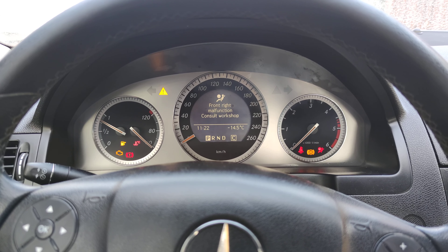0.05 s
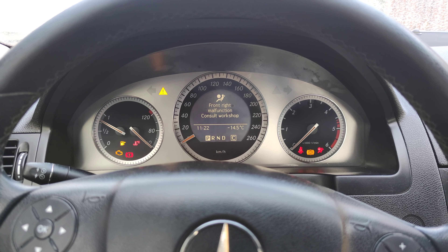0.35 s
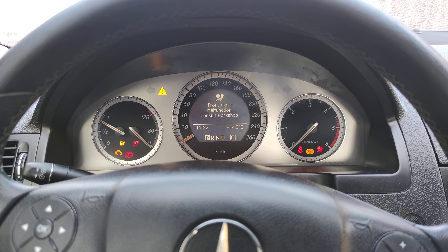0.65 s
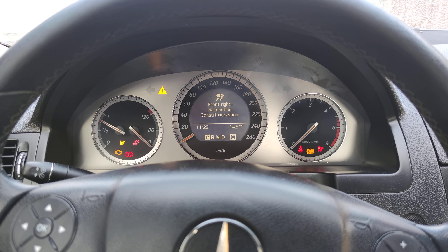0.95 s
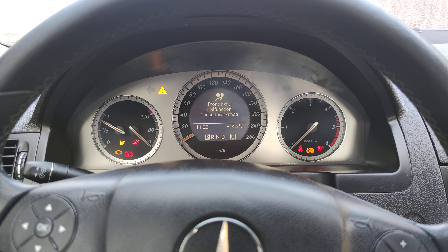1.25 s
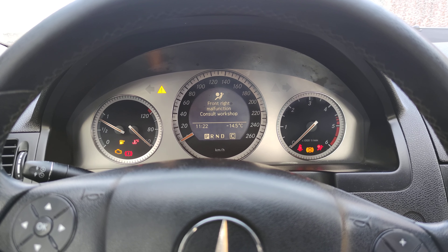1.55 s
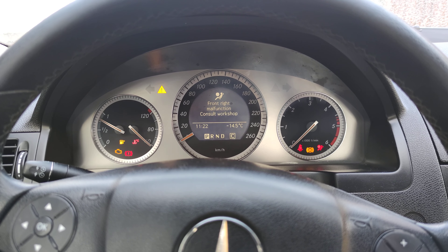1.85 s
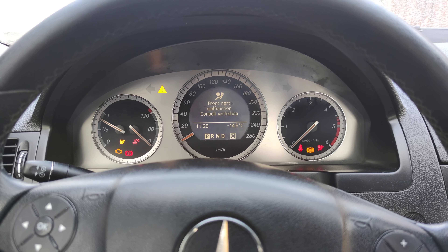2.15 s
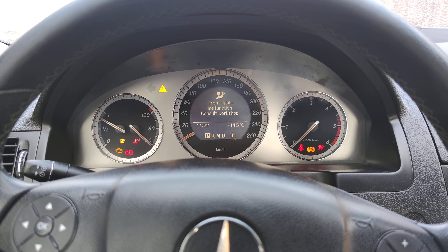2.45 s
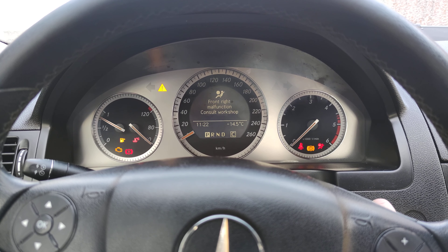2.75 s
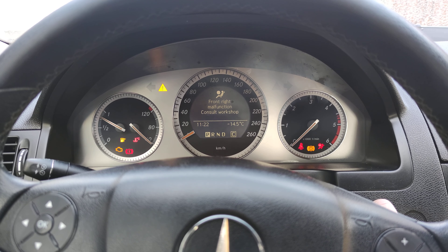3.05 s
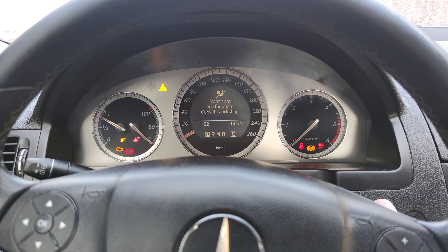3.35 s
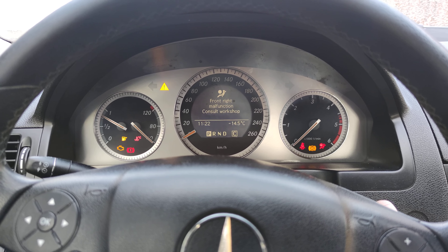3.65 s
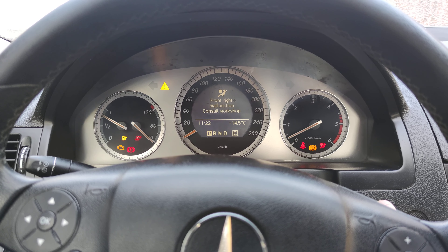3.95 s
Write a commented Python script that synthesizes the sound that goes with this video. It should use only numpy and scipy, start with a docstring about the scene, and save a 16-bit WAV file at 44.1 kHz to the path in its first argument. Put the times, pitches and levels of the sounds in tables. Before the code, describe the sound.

A car engine starts, heard from the driver's seat. A faint fuel pump hum runs down, the key clicks in the ignition, and the starter whines unevenly until the engine catches with low thumps and dashboard rattles.

```python
"""A car engine starts, heard from the driver's seat. First the fuel pump hums and runs down, and the
key clicks round in the lock. The starter's gear teeth whine, slowing each time the engine squeezes
the air in a cylinder. Then the engine catches: its first firings thump through the car's body and
make something rattle in the dashboard."""
import sys
import numpy as np
from scipy import signal
from scipy.fft import rfft, irfft, next_fast_len
from scipy.io import wavfile
from scipy.ndimage import map_coordinates

SR = 44100
rng = np.random.default_rng(int(sys.argv[2]) if len(sys.argv) > 2 else 0)


def transcribe(u):
    """Save the signal u as a 16-bit wav file named by the first command-line argument.

    u: samples, shape (n,) or (channels, n), limited to [-1, 1]; the rate is SR.
    q: integer samples, one column per channel.
    """
    v = np.clip(np.atleast_2d(u).T, -1, 1)
    q = np.round(v * 32767).astype(np.int16)
    wavfile.write(sys.argv[1], SR, q)


N = 176400

# The tones of the pump's hum. Each row: multiple of the shaft's turning rate, level in dB.
PUMP_TONES = [(2, -79), (3, -65.5), (4, -83), (5, -62.5), (7, -85)]
# Pitches at which the pump's mount likes to shake. Each row: pitch in Hz, width in Hz, boost in dB.
MOUNT_PEAKS = [(109.8, 8.9, 10.5), (147, 7.3, -1)]
# The faint background sound in the cabin. Each row: frequency in Hz, level in dB.
QUIET_COLOUR = [(13, -66), (22, -13), (70, -5.5), (112, -5), (156, -8), (200, -11.5), (223, -13.5),
                (256, -13), (690, -20), (885, -20), (1670, -28.5), (1910, -27.5), (6620, -42.5),
                (8720, -33), (11500, -37), (14700, -30.5), (16000, -39)]
# Small ticks, then clatter once the engine fires.
# Each row: start in seconds, level in dB, centre in Hz, width in octaves, fade time in seconds.
TRIM_TICKS = [(0.274, -58, 4000, 1.8, 0.072), (0.671, -56, 8900, 0.045, 0.018),
              (1.766, -58, 2500, 0.89, 0.035), (2.436, -40, 865, 0.35, 0.043),
              (3.584, -42, 760, 0.54, 0.032), (3.669, -52, 2550, 0.4, 0.049),
              (3.707, -51, 2480, 1.2, 0.031), (3.708, -37, 870, 0.48, 0.052),
              (3.741, -43, 3000, 0.82, 0.069), (3.797, -46.5, 897, 0.79, 0.046),
              (3.742, -34.5, 903, 0.23, 0.039), (3.848, -42, 3080, 0.54, 0.087),
              (3.913, -43, 2820, 0.53, 0.086), (3.963, -54, 3260, 1.3, 0.12), (3.983, -44, 785, 1.13, 0.21)]
# Ringing metal. Each row: pitch in Hz, width in Hz, boost in dB.
METAL_PEAKS = [(736, 145, 6.5), (2408, 41, 13.5), (2870, 240, 5), (3554, 126, 10.5), (8200, 900, 8.5)]
# Soft bumps and dull knocks. Each row: start in seconds, level in dB, pitch in Hz.
PANEL_BUMPS = [(0.284, -59, 208), (1.596, -62, 297), (0.395, -45, 192.5), (2.442, -48.5, 296),
               (2.514, -44, 79), (2.779, -32, 412), (3.581, -31, 361), (3.589, -26.5, 299.4),
               (3.715, -32, 384), (3.788, -37.5, 376), (3.866, -32.5, 266)]
# The hand rubbing on the key. Each row: time in seconds, level in dB.
RUB_LEVELS = [(2.15, -73.5), (2.3, -69), (2.42, -59), (2.52, -58), (2.6, -70), (2.7, -67.5), (2.8, -83)]
# The tone of that rubbing. Each row: frequency in Hz, level in dB.
RUB_COLOUR = [(120, -39), (200, -19), (334, -2.5), (569, 3), (749, -5), (821, -2), (1740, -1),
              (6760, -13.5), (7680, -10.5), (16000, -17)]
# A faint relay-like click (the first two rows), then the key and lock. Each row: start in seconds,
# level in dB, treble tilt in dB per octave, favoured frequency in Hz, fade time in seconds.
CLICKS = [(0.971, -49, -1.5, 1690, 0.03), (0.975, -53.5, 2.5, 3220, 0.048),
          (2.435, -38.5, -2.5, 900, 0.051), (2.477, -33, -1, 7550, 0.063), (2.718, -44.5, -2, 8500, 0.13),
          (2.748, -28.5, -0.1, 4200, 0.11), (2.762, -24, 1, 8150, 0.037), (2.835, -35.5, 1, 2700, 0.05),
          (2.895, -51, 0, 7500, 0.028)]
# The tone those clicks share. Each row: frequency in Hz, level in dB.
CLICK_COLOUR = [(120, -3), (250, -7.5), (520, -7), (850, -7), (1400, -10), (1800, -7), (2700, -10),
                (4600, -9.5), (6600, -15.5), (8200, -8), (10500, -15.5), (12000, -14), (16000, -12.5)]
# The metallic ring of the clicks. Each row: pitch in Hz, width in Hz, boost in dB.
CLICK_PEAKS = [(1700, 76, 7.5), (1774, 78, 7), (2330, 47, 9.5), (3190, 120, 8.5), (4250, 44, -1),
               (8100, 600, 1.5), (9800, 470, 6.5)]
# The starter's speed and strength. Each row: time in seconds, teeth meeting per second, level in dB.
CRANKING = [(2.79, 248.5, -83), (2.87, 324.5, -46.5), (2.95, 336.2, -54.5), (3.03, 334.3, -55),
            (3.07, 307, -46.5), (3.12, 258.9, -47), (3.16, 205.6, -41.5), (3.21, 163.7, -47),
            (3.28, 133.4, -75), (3.34, 361.6, -46), (3.39, 295.9, -52.5), (3.43, 254, -39.5),
            (3.5, 185, -60.5), (3.58, 171.3, -64), (3.68, 333, -72)]
# The tones of its whine. Each row: multiple of the tooth rate, level in dB.
WHINE_TONES = [(1, -7.5), (2, 2), (3, -3.5), (4, -23), (5, -14), (6, -10)]
# The path from the engine bay to the cabin. Each row: pitch in Hz, width in Hz, boost or cut in dB.
WALL_PEAKS = [(159, 55, 29.5), (274.5, 56, 18.5), (386, 110, 12.5), (583, 59, -15), (722, 110, 12),
              (889.6, 49, 18), (1096, 18, 13)]
# The turning engine. Each row: time in seconds, then rumble, gear noise and hiss levels in dB.
ENGINE_LEVELS = [(2.75, -98, -94, -91), (2.8, -41, -57, -87), (2.95, -45.5, -56.5, -75.5),
                 (3.1, -50, -55, -74.5), (3.2, -54, -57, -85), (3.3, -59, -58.5, -71.5),
                 (3.34, -44.5, -53, -70), (3.47, -49.5, -58, -80.5), (3.52, -42, -56, -68),
                 (3.62, -34.5, -48, -74), (3.68, -37, -52, -69.5), (3.8, -33.5, -51, -67.5),
                 (4.0, -32.5, -49, -66)]
# The tone of the rumble. Each row: frequency in Hz, level in dB.
ENGINE_RUMBLE = [(15, -33), (28, -1), (50, -4.5), (80, -8.5), (115, -1), (150, -7.5), (210, -18.5),
                 (280, -18), (400, -62), (600, -120)]
# The tone of the gears and valves. Each row: frequency in Hz, level in dB.
ENGINE_GEARS = [(150, -2), (290, 8.5), (400, 4.5), (580, -2.5), (800, -6), (1250, -9.5), (2000, -14),
                (2500, -19), (3600, -18), (4500, -24.5), (6500, -29.5), (16000, -39)]
# The tone of the hiss. Each row: frequency in Hz, level in dB.
ENGINE_HISS = [(2000, -40), (4500, -0.5), (6500, -17.5), (7500, -3.5), (8500, 1), (9200, -6), (11000, -11),
               (12000, -12.5), (16000, -10.5)]
# The engine jolts on its mounts as the starter engages and the cylinders squeeze and fire.
# Each row: start in seconds, boom level in dB, boom pitch in Hz, body level in dB, knock level in dB.
ENGINE_JOLTS = [(2.776, -32, 104, -33, -34), (2.791, -24, 101, -28, -35), (2.879, -38.5, 99, -37.5, -53),
                (3.023, -35, 103, -50, -66), (3.325, -29.5, 124, -39, -42), (3.341, -29, 111, -32, -39.5),
                (3.418, -34.5, 109.3, -52, -43.5), (3.582, -42, 99, -40, -30.5), (3.593, -19, 82, -28, -31),
                (3.651, -26, 89, -35, -60), (3.708, -18, 116.8, -21.5, -32),
                (3.818, -17.5, 109.5, -27.5, -46), (3.879, -20.5, 97, -43, -52),
                (3.912, -20, 70.4, -33, -40), (3.946, -28, 115, -36, -41), (3.973, -26.5, 97, -24, -39.5)]
# Deep notes of the car's body. Each row: pitch in Hz, level in dB, fade time in seconds.
BODY_NOTES = [(35.6, -13, 0.34), (56.2, -1.5, 0.28)]
# The tone of a jolt's knock. Each row: frequency in Hz, level in dB.
ENGINE_KNOCK = [(80, 7.5), (200, -16), (290, 10.5), (370, 0.5), (480, -2.5), (600, -18), (730, -16),
                (880, -11.5), (1090, -20), (1400, -18), (2000, -30), (4000, -39.5), (6500, -50),
                (8200, -42.5), (16000, -66)]
# How alike left and right are. Each row: frequency in Hz, likeness (1 is the same, 0 is unrelated).
STEREO_LIKENESS = [(60, 0.95), (150, 0.87), (300, 0.4), (600, 0.26), (1200, -0.096), (2500, 0.1),
                   (16000, -0.15)]
# The balance of the two microphones. Each row: frequency in Hz, left minus right in dB.
MIC_BALANCE = [(60, 0.5), (120, 3), (200, -1), (290, -5), (400, -1), (700, 0), (1250, 2), (2400, 2.5),
               (5000, 0.5), (6400, -3), (7600, 24), (8700, 20), (10000, 11.5), (14000, 1)]

PUMP_OFF_S, PUMP_SLOW_S = 1.935, 0.36  # when the pump switches off; time to sink to 37% of its speed


def amp(db):
    """Turn decibels into a number to multiply by."""
    return 10 ** (np.asarray(db) / 20)


def unit(x):
    """Scale x to an average power of 1."""
    return x / np.sqrt(np.mean(x ** 2) + 1e-20)


def along(points, hz):
    """Read a table between its rows, on a scale of octaves."""
    frequencies, values = np.transpose(points)
    return np.interp(np.log(hz + 1), np.log(frequencies + 1), values)


def lift(peaks, hz):
    """The dB that a part's resonances (its favourite pitches) add at each frequency."""
    return sum(db / (1 + (2 * (hz - centre) / width) ** 2) for centre, width, db in peaks)


def band(centre_hz, octaves):
    """A bell-shaped colour: a function that gives dB for each frequency."""
    def colour(hz):
        distance = np.log2((hz + 1) / centre_hz) / octaves
        return -20 * np.log10(1 + distance ** 2 / 2 + (distance / 2) ** 4)
    return colour


def clock():
    """The time of each sample in seconds."""
    return np.arange(N) / SR


def curves(rows):
    """Join a table's rows over time, giving one curve for each column after the first."""
    times, *columns = np.transpose(rows)
    return [np.interp(clock(), times, column) for column in columns]


def wobble(rate):
    """A smooth curve through rate random values a second."""
    return map_coordinates(rng.standard_normal(N // 40), [clock() * rate], mode="mirror")


def filtered(x, response):
    """Multiply each frequency in x by the gain that response gives it."""
    size = next_fast_len(N + SR // 2)
    hz = np.fft.rfftfreq(size, 1 / SR)
    return irfft(rfft(x, size) * response(hz), size)[..., :N]


def noise(colour, size=N):
    """Stereo noise of a given colour; left and right are alike in the bass but not in the treble."""
    hz = np.fft.rfftfreq(size, 1 / SR)
    spread = np.arccos(np.clip(along(STEREO_LIKENESS, hz), -1, 1)) / 2
    phases = np.exp(2j * np.pi * rng.random((2, len(hz))))
    mid, side = irfft(phases * amp(colour(hz)) * [np.cos(spread), np.sin(spread)], size)
    return unit(np.array([mid + side, mid - side]))


def decay(fade_s, rise_s):
    """A half-second shape that rises quickly, then falls by 60 dB in each fade time."""
    t = np.arange(SR // 2) / SR
    return np.exp(-np.log(1000) * t / fade_s) * (1 - np.exp(-t / rise_s))


def burst(colour, fade_s, rise_s):
    """A dying puff of noise."""
    return noise(colour, SR // 2) * decay(fade_s, rise_s)


def ring(notes, rise_s):
    """The pure tones of a struck part start together and die away."""
    t = np.arange(SR // 2) / SR
    return sum(amp(db) * np.sin(2 * np.pi * hz * t) * decay(fade_s, rise_s) for hz, db, fade_s in notes)


def click(colour, fade_s):
    """A hard contact: a brief crack, then the part rings out."""
    crack = amp(-5) * decay(fade_s=0.0066, rise_s=0.000067)
    ringing = 1.077 * decay(fade_s, rise_s=0.0014)
    return noise(colour, SR // 2) * (crack + ringing)


def add(out, start_s, x):
    """Mix x into out from the given time."""
    part = out[:, round(start_s * SR):][:, :x.shape[-1]]
    part += x[..., :part.shape[1]]


def fuel_pump():
    """The spinning pump hums; switched off, it slows and shudders through its mount's resonances."""
    running_hz, coast_s, fade_db_per_s = 39.6, 0.11, 120
    since_off = np.maximum(clock() - PUMP_OFF_S, 0)
    shaft_hz = running_hz * np.exp(-since_off / PUMP_SLOW_S) * (1 + 0.0022 * wobble(19))
    turns = np.cumsum(shaft_hz) / SR
    coasting = np.minimum(since_off / 0.025, 1)
    fade_db = fade_db_per_s * np.maximum(since_off - coast_s, 0)
    hum = 0
    for multiple, db in PUMP_TONES:
        shudder_db = coasting * (4 * (multiple < 5) + 2 * wobble(60))  # low tones shake harder
        waver_db = 1.5 * wobble(30.22)
        mount_db = lift(MOUNT_PEAKS, multiple * shaft_hz)
        hum += amp(db + mount_db + shudder_db + waver_db) * np.sin(2 * np.pi * multiple * turns)
    return np.sqrt(2) * hum * amp(-fade_db)


def cabin_quiet():
    """Faint background rumble and hiss in the cabin, a little softer once the pump has stopped."""
    stopped = np.clip((clock() - PUMP_OFF_S) / PUMP_SLOW_S, 0, 1)
    level_db = -63.5 - 2 * stopped + 0.44 * wobble(7.2)
    return amp(level_db) * noise(lambda hz: along(QUIET_COLOUR, hz))


def cabin_trim():
    """Small parts tick and clatter, and bumped panels ring briefly with a soft scuff."""
    bump_fade_s, bump_rise_s = 0.11, 0.0029
    out = np.zeros((2, N))
    for start_s, db, centre_hz, octaves, fade_s in TRIM_TICKS:
        colour = lambda hz: band(centre_hz, octaves)(hz) + lift(METAL_PEAKS, hz)
        add(out, start_s, amp(db) * click(colour, fade_s))
    for start_s, db, pitch_hz in PANEL_BUMPS:
        scuff = amp(-7.5) * burst(band(pitch_hz, octaves=0.44), bump_fade_s, bump_rise_s)
        panel = ring([(pitch_hz, 0, bump_fade_s)], bump_rise_s)
        add(out, start_s, amp(db) * (panel + scuff))
    return out


def clicks_and_key():
    """A faint relay-like click comes first; later the hand rubs the key and the turning lock clicks."""
    focus_db, focus_octaves = 5, 0.4  # each click favours one range of pitches
    rub_db, = curves(RUB_LEVELS)
    out = amp(rub_db + wobble(39.98)) * noise(lambda hz: along(RUB_COLOUR, hz))
    for start_s, db, tilt_db, focus_hz, fade_s in CLICKS:
        def colour(hz):
            focus = focus_db * np.exp(-(np.log2((hz + 1) / focus_hz) / focus_octaves) ** 2)
            return along(CLICK_COLOUR, hz) + lift(CLICK_PEAKS, hz) + focus + tilt_db * np.log2(hz + 1)
        contact = click(colour, fade_s)
        tail = amp(-15.5) * burst(colour, fade_s=0.17, rise_s=0.011)
        add(out, start_s, amp(db) * (contact + tail))
    return out


def starter():
    """A magnet clacks the gear in; its teeth whine and grind, slowing as each cylinder squeezes."""
    tooth_hz, level_db = curves(CRANKING)
    engaged = clock() > CRANKING[0][0]
    level = amp(level_db) * engaged
    teeth = np.cumsum(tooth_hz * (1 + 0.0438 * wobble(120))) / SR
    whine = sum(amp(db + 3.5 * wobble(110)) * np.sin(2 * np.pi * multiple * teeth)
                for multiple, db in WHINE_TONES)
    whine = level * unit(filtered(whine, lambda hz: amp(lift(WALL_PEAKS, hz))))
    cabin = burst(np.zeros_like, fade_s=0.27, rise_s=0.0012)  # the cabin's echo, even at all pitches
    cabin /= np.linalg.norm(cabin[0])
    echo = signal.fftconvolve(whine[None], cabin, axes=1)[:, :N]
    rasp = noise(lambda hz: band(690, octaves=0.67)(hz) + 0.5 * lift(WALL_PEAKS, hz))
    grind = level * (1 + np.cos(2 * np.pi * teeth)) * rasp  # swells once for each tooth
    out = 0.64 * whine + amp(-5.5) * echo + amp(-13) * grind
    clack = amp(-30) * burst(band(786, octaves=0.31), fade_s=0.089, rise_s=0.00071)
    add(out, start_s=2.761, x=clack)
    return out


def engine():
    """Each jolt booms in the cabin air, shakes the body and knocks, over rumble, gear noise and hiss."""
    rumble_db, gear_db, hiss_db = curves(ENGINE_LEVELS)
    gear_colour = lambda hz: along(ENGINE_GEARS, hz) + lift(METAL_PEAKS, hz)
    out = amp(rumble_db) * noise(lambda hz: along(ENGINE_RUMBLE, hz))
    out += amp(gear_db + 2.1 * wobble(70)) * noise(gear_colour)
    out += amp(hiss_db + 1 + 3.8 * wobble(60)) * noise(lambda hz: along(ENGINE_HISS, hz))
    body = ring(BODY_NOTES, rise_s=0.0048)
    knock_colour = lambda hz: along(ENGINE_KNOCK, hz) + lift(METAL_PEAKS, hz)
    boom_fade_s = 0.14
    for start_s, boom_db, boom_hz, body_db, knock_db in ENGINE_JOLTS:
        boom = ring([(boom_hz, boom_db, boom_fade_s)], rise_s=0.0029)
        knock = burst(knock_colour, fade_s=0.17, rise_s=0.00034)
        add(out, start_s, boom + amp(body_db) * body + amp(knock_db) * knock)
    return out


def scene():
    """Everything heard from the driver's seat."""
    return fuel_pump() + cabin_quiet() + cabin_trim() + clicks_and_key() + starter() + engine()


def record(dry):
    """Two microphones colour the sound differently; the very lowest and highest pitches are cut."""
    low_cut_hz, top_hz, fade_out_s = 5.2, 15780, 0.004

    def microphones(hz):
        left_over_right = amp(along(MIC_BALANCE, hz))
        sides = np.array([left_over_right, np.ones_like(hz)])
        same_power = np.sqrt(2 / (1 + left_over_right ** 2))
        passed = hz ** 2 / (hz ** 2 + low_cut_hz ** 2) * (hz < top_hz)
        return sides * same_power * passed
    fade_out = np.minimum((N / SR - clock()) / fade_out_s, 1)
    return filtered(dry, microphones) * fade_out


dry = scene()
out = record(dry)
transcribe(out)
```